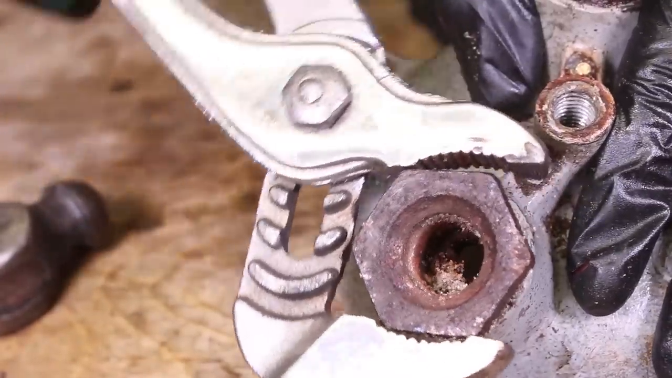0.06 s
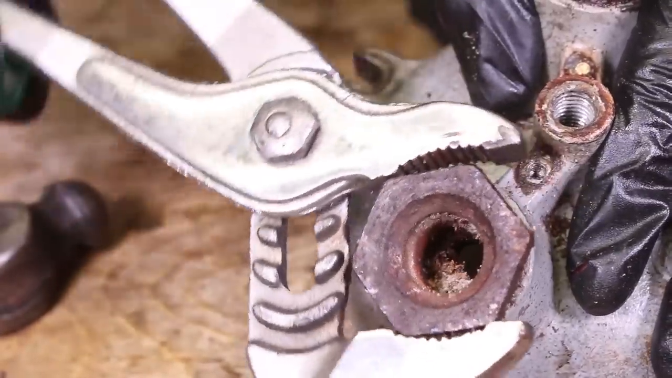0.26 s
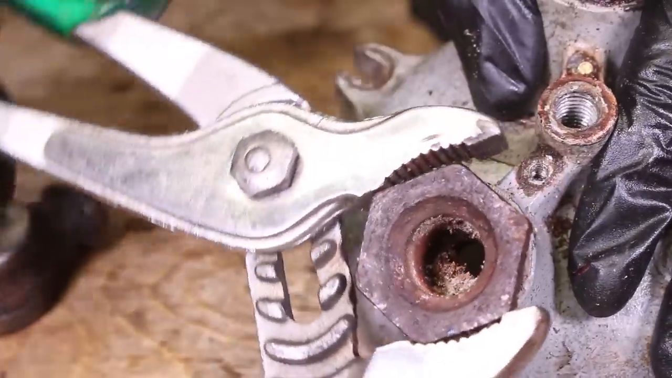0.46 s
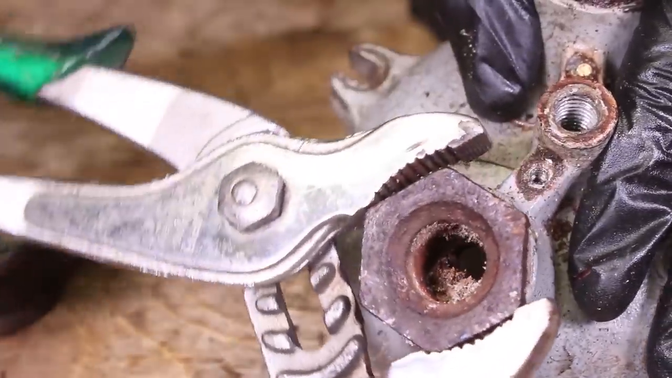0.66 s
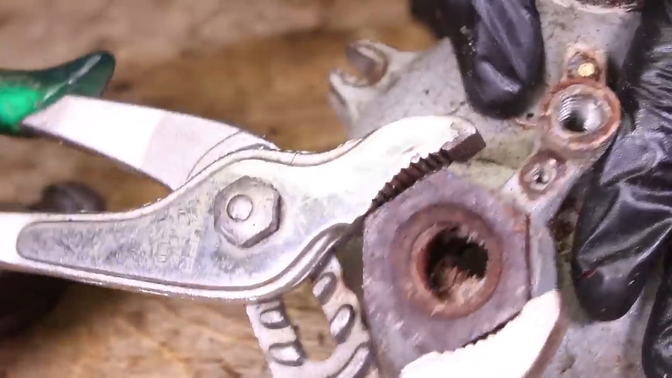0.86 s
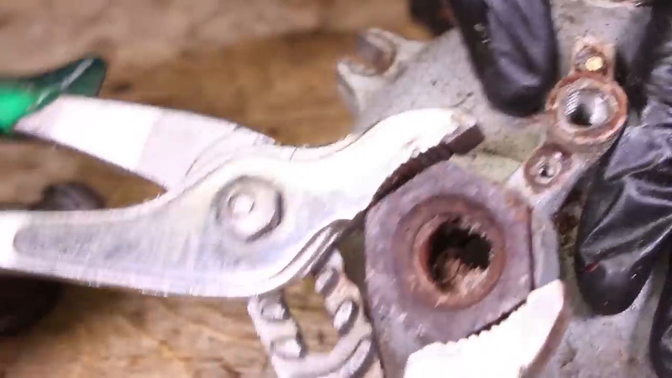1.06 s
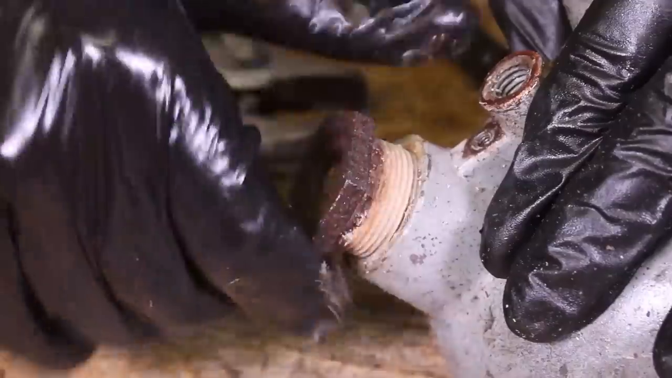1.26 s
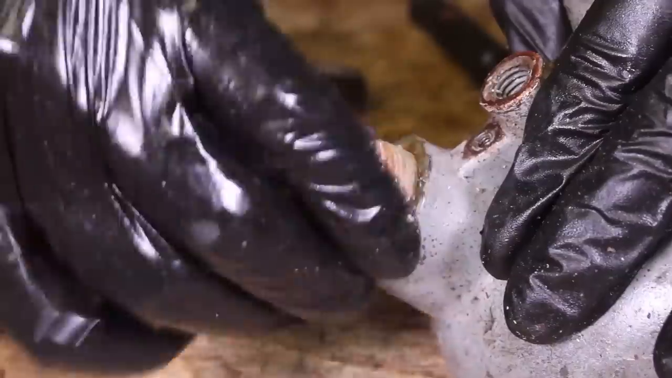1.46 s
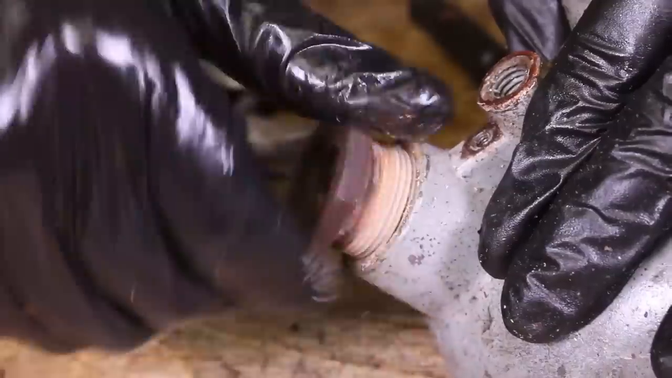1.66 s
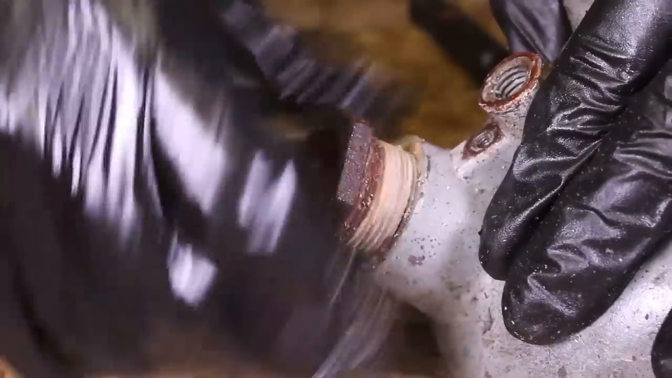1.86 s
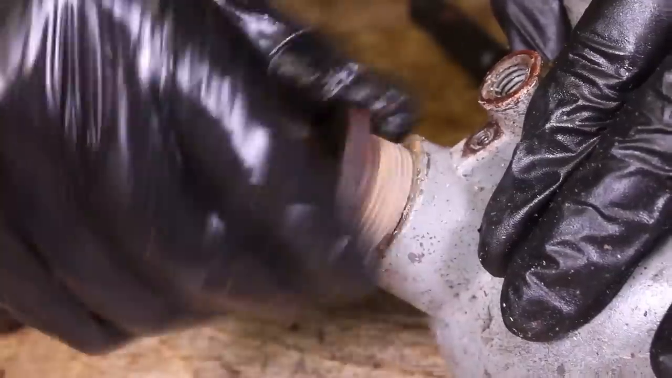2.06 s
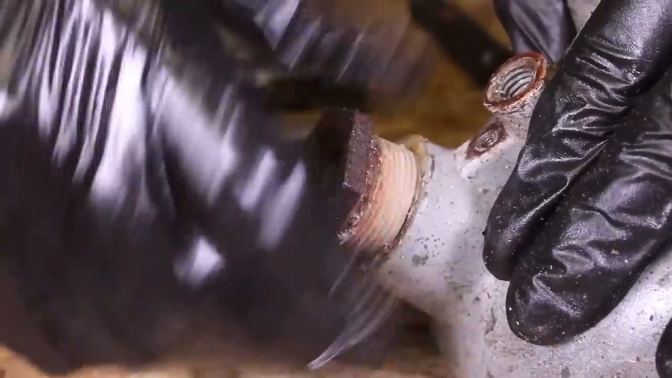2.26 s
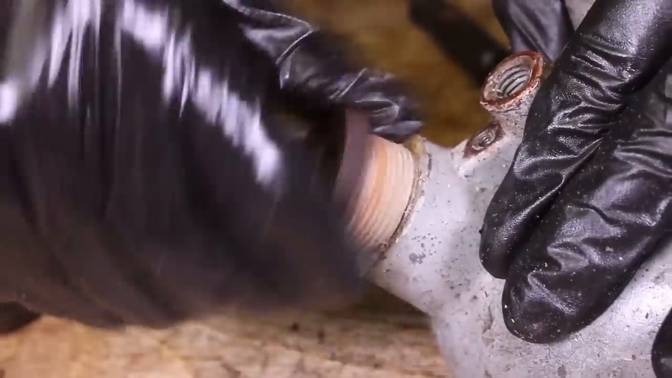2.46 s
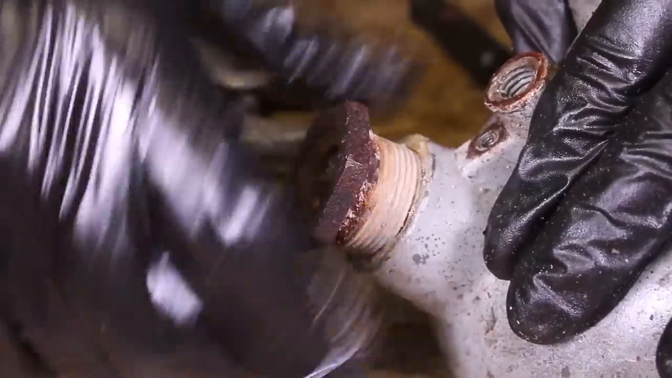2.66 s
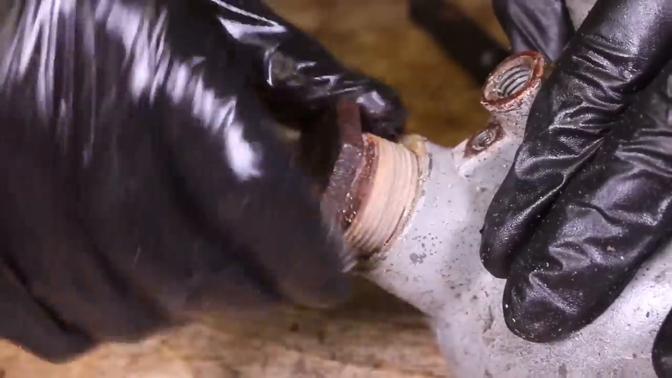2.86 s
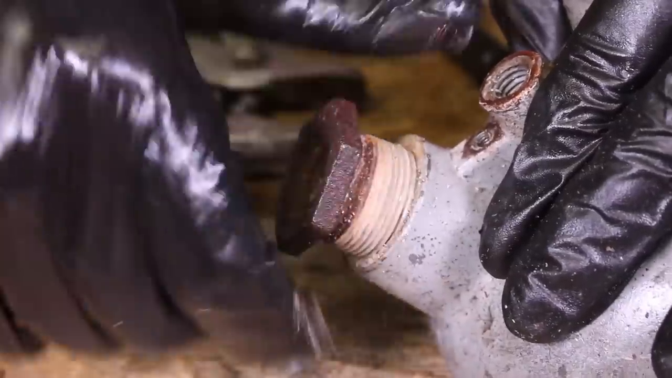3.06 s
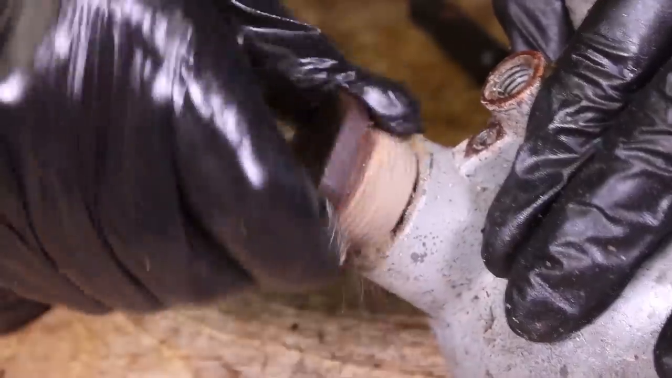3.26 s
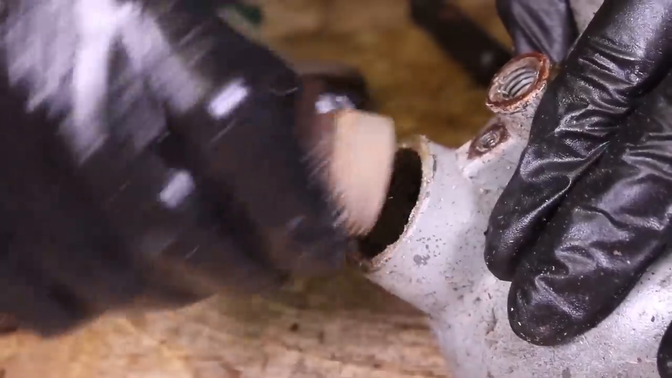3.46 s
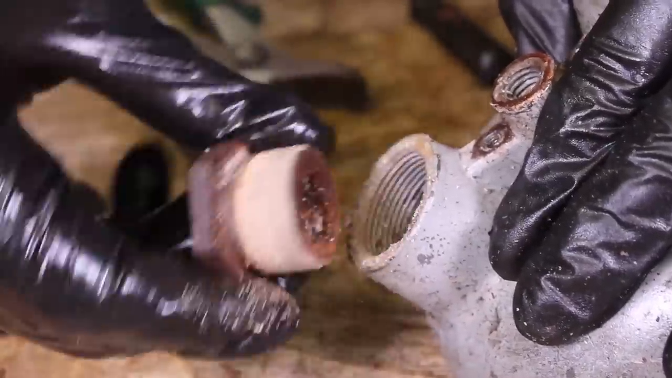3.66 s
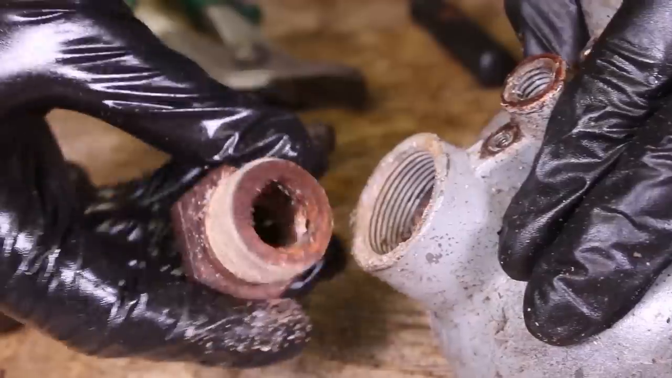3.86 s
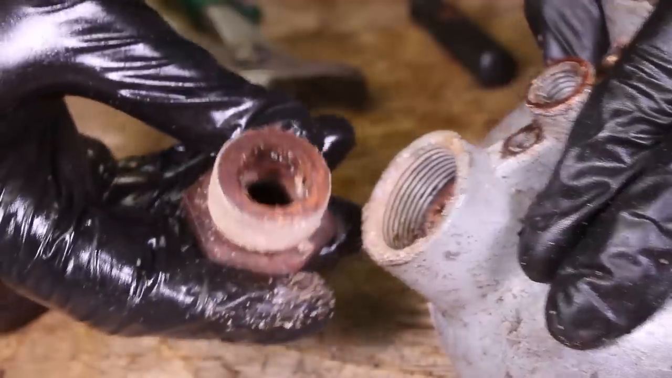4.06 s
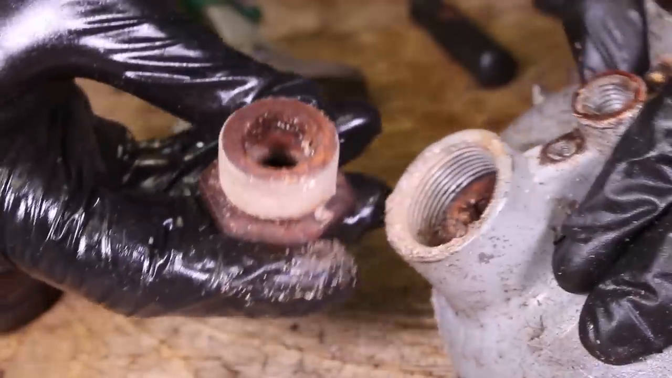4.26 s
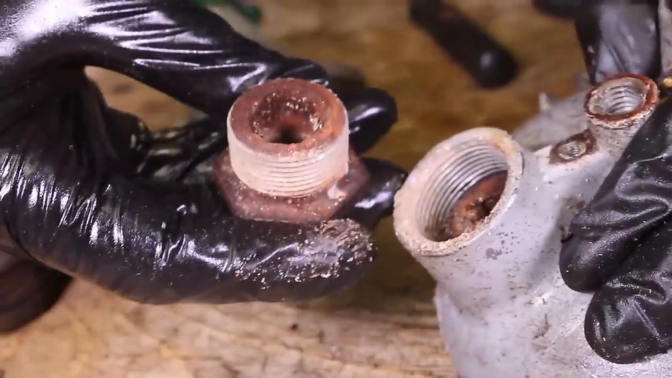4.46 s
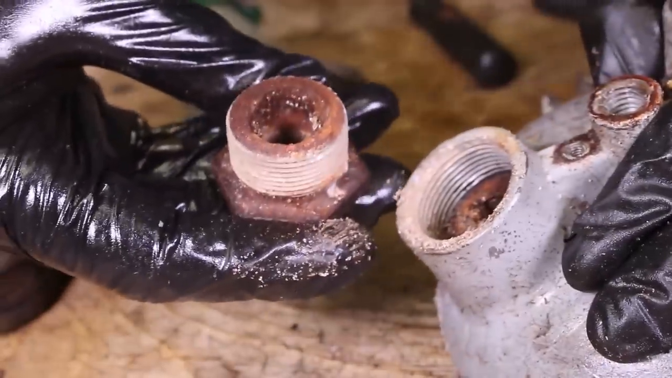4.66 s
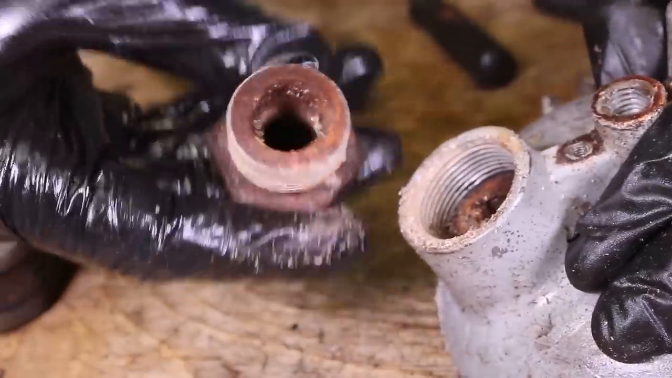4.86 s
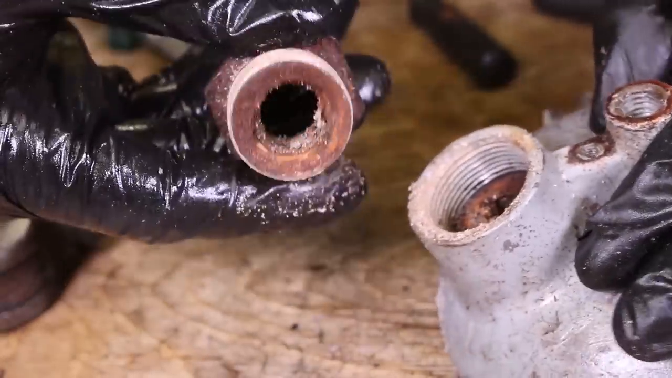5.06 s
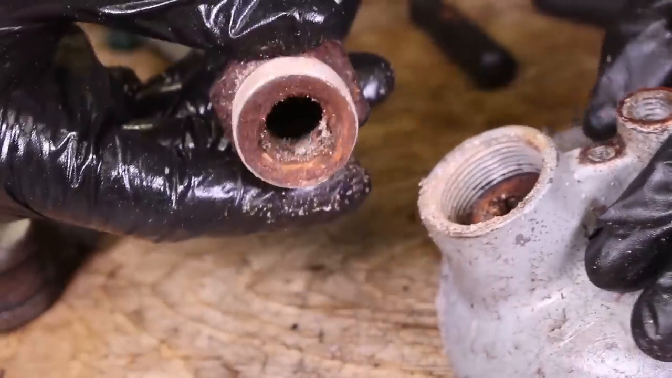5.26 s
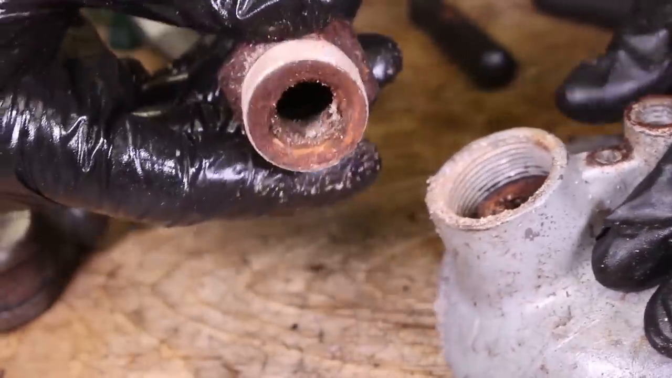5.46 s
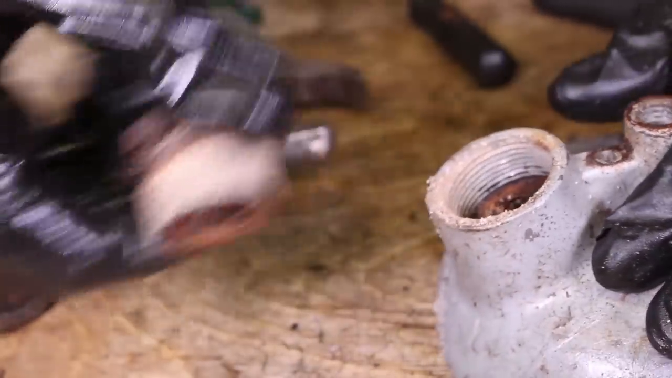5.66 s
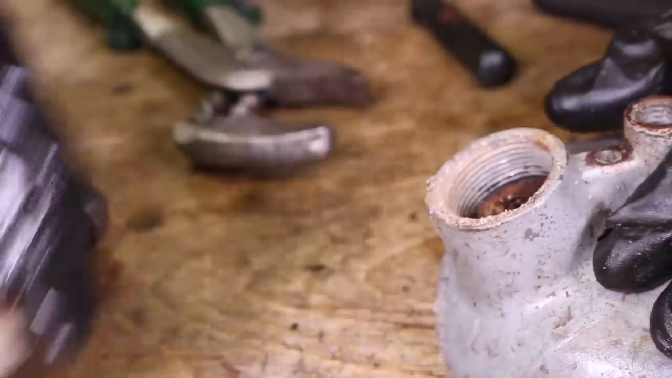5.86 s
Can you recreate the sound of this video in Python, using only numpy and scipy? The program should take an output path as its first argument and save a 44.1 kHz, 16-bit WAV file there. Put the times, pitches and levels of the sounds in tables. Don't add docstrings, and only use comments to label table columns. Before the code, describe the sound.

Close up in a small quiet workshop, plier jaws creak weakly on a seized nut for a second. It loosens with a soft bench thump, then gloved fingers twist it in separate gritty bursts, each rasping and knocking through the metal casting with low bench boom. A last hard clack frees it. Faint glove rustles and ticks follow, a light knock, quiet handling, and a final cluster of taps on wood.

```python
import sys
import numpy as np
from scipy import signal
from scipy.fft import rfft, irfft
from scipy.io import wavfile
from scipy.ndimage import uniform_filter1d

SR = 44100
rng = np.random.default_rng(int(sys.argv[2]) if len(sys.argv) > 2 else 0)


def how_loud(loudness_db):
    steps = np.asarray(loudness_db, float) / 20
    return 10 ** steps


def persist_wave(psi):
    counts = np.round(np.clip(psi, -1, 1) * 32767).astype(np.int16)
    wavfile.write(sys.argv[1], SR, np.atleast_2d(counts).T)


N = 261072

# pitch_hz, level_db (per Hz)
AIR_COLOUR = [(12, -34.5), (22, -5), (74, -24.5), (107, -14.5), (158, -30), (400, -25.5), (1510, -37.5),
              (15800, -43.5)]
# pitch_hz, level_db (rms)
MAINS_HUM = [(100.5, -88), (200, -80)]
# start_s, level_db, fade_s (per 20 dB)
CREAKS = [
    (.02, -71.5, 0.5),
    (.204, -64.5, 0.38),
    (.33, -64.5, 0),
    (.466, -69.5, 0.9),
    (.74, -60, 0.17),
    (.986, -57.5, 0.17),
    (1.041, -48.5, 0.16),
]
# time_s, ring_db
JAW_PRESSURE = [
    (0, -68),
    (.11, -74.5),
    (.25, -65),
    (.36, -76),
    (.6, -73),
    (.7, -90),
    (.94, -84),
    (1.0, -68),
    (1.06, -75),
]
# pitch_hz, level_db, t60_s
JAW_BODY = [(419.1, -2, 0.038), (698, -5.5, 0.036), (1082, -8.5, 0.036), (2251, 6.5, 0.0042)]
# pitch_hz, level_db, t60_s
JAW_RING = [(4250, 7, 0.011), (4670, -1, 0.019)]

# start_s, level_db, fade_s (per 20 dB)
JOLTS = [(.055, -42, 2.5), (.41, -39.5, 1), (.58, -46, -0.3), (0.713, -31.5, 0.35), (0.852, -24, 0),
         (1.075, -27.5, 0.24), (1.181, -34.5, 0.09), (1.444, -26, 0), (1.754, -27, 0), (2.108, -27, 0.01),
         (2.53, -36.5, 0.17), (2.93, -33.5, 0.18), (3.001, -32, 0.09), (3.065, -44, 0), (3.222, -41, 0.1),
         (3.351, -26, 0.15), (3.5, -48.5, 0.3), (5.1, -66, 1), (5.56, -25, 0.1), (5.68, -40, 0.17)]
# pitch_hz, level_db (per Hz)
SWAY_COLOUR = [(12, -19.5), (22, 4), (49, 0.5), (76, -20), (104, -29), (200, -47), (260, -70.5),
               (440, -120)]
# start_s, rustle_db, above_7khz_db, thin_top_db, fade_s (per 20 dB)
SLIDES = [(1.03, -58.5, -73, -73, 0), (1.18, -60.5, -63, -67, 1), (1.501, -41.5, -44.5, -48, 0.11),
          (1.604, -53.5, -51, -63, 0.07), (1.73, -64, -52, -59, .09), (1.828, -48, -50.5, -51, 0.09),
          (1.91, -63, -71, -69, 0.33), (2.075, -69, -66, -69, 0.4), (2.165, -60, -57, -54, 0.1),
          (2.203, -41, -57, -53, 0.03), (2.28, -57, -65, -64, 0.08), (2.315, -55.5, -58.5, -74, 0.04),
          (2.36, -67, -70, -73, 0.2), (2.575, -46.5, -50.5, -52, 0.09), (2.71, -62.5, -62.5, -69, 0.14),
          (2.925, -70, -58.5, -57, 0.14), (2.965, -66, -56, -54, -0.1), (3.02, -43, -39.5, -47, 0.0455),
          (3.15, -68.5, -71, -77, 0.2), (3.258, -71, -66, -60, 0.2), (3.32, -48, -46, -49, 0.03),
          (3.352, -41, -49.5, -48, -0.01), (3.45, -75, -75, -77, 0.36), (3.99, -72.5, -71.5, -78, 0.2),
          (4.04, -73.5, -73, -82, 0.14), (4.135, -69.5, -73, -78, .04), (4.35, -61.5, -75, -86, -1),
          (4.925, -48.5, -54.5, -62, 0.06), (5.0, -76, -61, -79, 2), (5.075, -67.5, -60.5, -79, 1.5),
          (5.13, -64, -61, -79, 5), (5.19, -69, -62, -80, 0.5), (5.291, -72, -68, -79, 1),
          (5.775, -80.5, -64, -78.5, 0.7)]
# start_s, rustle_db, above_7khz_db, thin_top_db, fade_s (per 20 dB)
GRABS = [(0.746, -63, -63.5, -76, 0.018), (0.87, -61.5, -64.5, -79, 0.15), (0.975, -65, -62, -75, 0.12),
         (1.196, -44.5, -52.5, -58, 0.1), (1.362, -62, -57, -63, 0.21), (1.684, -59, -54, -60, 0.097),
         (1.797, -64, -51, -57, .06), (2.038, -64, -60, -66, 0.066), (2.134, -64, -62, -58, .08),
         (2.422, -66, -61, -65.5, 0.11), (2.54, -51, -46.5, -54, .1), (2.832, -67, -52.5, -70, 0.043),
         (2.9, -70, -65, -61.5, .06), (3.22, -69.5, -60, -58.5, 0.051), (4.865, -64.5, -72, -74, 0.2),
         (4.158, -45, -49.5, -57, 0.09), (5.505, -45, -41.5, -51.5, 0.053), (5.538, -42.5, -63, -57, 0.074)]
# pitch_hz, level_db (per Hz)
GLOVE_COLOUR = [(880, -36.5), (1500, -16), (2290, -12), (4080, -3.5), (7500, 0), (9300, 0.5),
                (11000, -16.5), (16000, -55)]
# pitch_hz, level_db (per Hz)
GLOVE_TOP = [(6470, -33), (11000, -7), (13100, 5), (15100, -5.5), (15800, -10.5)]
# start_s, peak_db, pitch_hz
TICKS = [(0.2877, -54, 4500), (0.8659, -42, 6100), (0.9747, -41.5, 6700), (1.1308, -48, 5200),
         (1.1917, -39, 5700), (1.343, -44, 2510), (1.6845, -47, 9300), (1.761, -47, 8000),
         (1.901, -59, 11000), (1.9291, -41.5, 4440), (1.951, -49, 7000), (2.04, -53, 8500),
         (2.308, -40, 5300), (2.344, -45, 4100), (2.4268, -46.5, 8100), (2.833, -43.5, 8100),
         (3.2197, -46.5, 9500), (3.226, -43.5, 9500), (3.239, -53.5, 5190), (3.247, -55, 4770),
         (3.6696, -54.5, 4970), (3.927, -55, 5010), (4.001, -56.5, 5500), (4.027, -53.5, 3500),
         (4.036, -56, 8200), (4.134, -52.5, 5600), (4.3308, -51, 5240), (4.382, -54, 5010),
         (4.4308, -56.5, 5530), (4.6195, -57, 6200), (4.873, -51.5, 5900), (5.025, -46, 8080),
         (5.0832, -43.5, 4940), (5.1558, -46.5, 5870), (5.239, -46.5, 4220), (5.207, -49, 4810),
         (5.29, -51.5, 5800), (5.378, -53.5, 6200)]

# bite_s, fastest_s, bite_db, fastest_db, fade_s (per 20 dB)
TURNS = [(0.971, 1.04, -54.5, -62, -0.8), (1.259, 1.287, -60.5, -65.5, 0.5),
         (1.347, 1.382, -59.5, -73, 0.2), (1.388, 1.396, -47, -50.5, 0.07),
         (1.419, 1.503, -31.5, -26.5, 0.01), (1.506, 1.554, -27.5, -31, -0.0258),
         (1.592, 1.61, -40.5, -52, 0.07), (1.715, 1.73, -59, -50, 0.05), (1.737, 1.794, -28, -28, -0.3),
         (1.811, 1.84, -20.5, -21.5, 0), (2.04, 2.068, -58, -55, 1), (2.078, 2.136, -34, -30.5, 0.0647),
         (2.142, 2.215, -19, -27.5, -0.05), (2.428, 2.465, -56.5, -54, 0.22),
         (2.472, 2.551, -33.5, -22, .02), (2.559, 2.608, -19, -32, .06), (2.66, 2.721, -44.5, -48.5, 0.02),
         (2.842, 2.851, -55, -43.5, .02), (2.863, 2.886, -36, -32.5, -0.5),
         (2.904, 2.937, -14.5, -24, 0.0051), (2.992, 3.007, -38, -45, 0.0868),
         (3.296, 3.308, -28.5, -12.5, 0.0038), (3.324, 3.364, -22, -31.5, -0.02)]
# start_s, boom_db, rasp_db, nut_lower_db, nut_upper_db
GRIPS = [(0, 0.1, -1, -0.2, 1), (1.37, 3.5, 4.5, -2, -2), (1.46, 1.6, 4.5, -0.5, -1.5),
         (1.7, 1.5, 0.5, -6, -5.5), (1.8, 0.5, -1, -1.5, -2.5), (2.03, 0.5, -5.5, -0.5, -4.1),
         (2.125, -3, 1, -4.5, 2.5), (2.18, 0, -0.8, -1, -1.5), (2.41, 4.2, 1, 1, 3),
         (2.54, 0, -0.5, -1.1, 4.7), (2.83, 3.2, -9, -10, -12), (2.89, 0.5, -1.8, 2, -4),
         (3.25, 1.3, 1.5, -2, 2.5), (3.315, 1.1, -2, -5.5, 5)]
# start_s, edge_db, housing_db, nut_db, thud_db
CATCHES = [(1.3921, -55, -42, -67, -40), (1.4218, -21.5, -32, -52, -35), (1.7344, -15.5, -21, -57.5, -26.5),
           (1.7587, -37, -27.5, -54.5, -44), (1.8068, -25, -17.5, -41, -31), (1.8258, -40, -19.5, -30, -44),
           (2.0687, -48, -31.5, -71, -35), (2.084, -44, -29, -58, -44.5), (2.1345, -24, -27.5, -38, -44),
           (2.175, -31, -23, -52, -44), (2.4736, -6, -26, -26, -35.5), (2.5565, -23.5, -16, -31, -32.5),
           (2.8655, -60, -37.5, -70, -42), (2.898, -30, -21, -51, -39), (2.9082, -31.5, -16.5, -23, -38.5),
           (2.9276, -15, -19, -38, -38), (2.94, -25, -23.5, -41.5, -45), (3.3056, 2.5, -13, -25.5, -24),
           (3.3083, -8, -21, -35, -40), (3.322, -30, -22, -30, -40)]
# pitch_hz, level_db, t60_s
HOUSING = [(235, -18, 0.014), (297.2, -1.5, .09), (342.2, -6, 0.053), (411, -4.5, 0.046),
           (471.5, -3.5, .055), (550, -10, 0.016), (651, -0.5, 0.045), (679.3, -1.5, 0.05),
           (729.3, -2, 0.049), (838.7, -7.5, 0.0065), (1073, -1.5, 0.029), (917, -8.5, 0.02),
           (570.2, 5, 0.0031), (941.6, 5, 0.0045)]
# pitch_hz, level_db, t60_s
RASP = [(1334, 1, 0.016), (1488, 1, 0.022), (1656, 5, 0.018), (2130, -3.5, 0.012), (2479, -7.5, 0.0076),
        (2860, -3, 0.017), (3450, -2, 0.0034), (1860, 5, 0.0026), (2520, 3.5, .003), (3150, 2, 0.0021)]
# pitch_hz, level_db, t60_s
NUT = [(3888, 0, .045), (4185, -1, .05), (4480, -13, .015), (4790, -17, .02), (5400, -22, .015)]
# pitch_hz, level_db, t60_s
BENCH = [(40, -7, 0.075), (64, 1, 0.2), (106, 4, 0.14), (140, 2.5, 0.18), (170, -6, 0.12)]

# start_s, level_db, thud_db
SET_DOWN = [
    (1.057, -12, -32),
]
# pitch_hz, level_db, t60_s
WOOD = [(298, -2.5, 0.079), (371, 2, 0.027), (578, -8.5, 0.0264), (754, -11, 0.029), (1005, -4.5, 0.015),
        (1630, -12.5, 0.0067), (2066, -8, 0.0094), (3040, -10.5, .02)]
# start_s, mid_crack_db, dull_db, high_crack_db, thud_db
KNOCKS = [
    (4.1564, -22, -19.5, -40, -66),
    (4.1666, -26.5, -16.5, -39, -72),
    (4.1756, -22, -17, -37, -92.5),
    (5.414, -38, -28.5, -67, -75),
    (5.4285, -34, -18.5, -66, -65.5),
    (5.457, -39, -24, -55, -61),
    (5.5048, -23.5, -16, -28, -63),
    (5.5333, -23, -16, -34, -49),
    (5.5431, -23.5, -15.5, -41, -31),
    (5.5732, -18.5, -25, -62, -36.5),
]
# pitch_hz, level_db, t60_s
PART = [(326, -3, 0.049), (466, 0.5, 0.036), (690, 4.5, 0.018), (1008, 2.5, 0.014), (1510, -4, 0.013)]
# pitch_hz, level_db, t60_s
PART_SURFACE = [(1794, 2.5, 0.0036), (2662, 0, .005), (3120, 3, 0.0019), (4187, 0.5, 0.0028),
                (5320, -1.5, 0.0025)]
# start_s, dull_db, bright_db, rise_s, fade_s (per 20 dB)
SCUFFS = [(4.168, -25.5, -29.5, 0.01, 0.015), (4.2, -36, -41, 0.0343, 0.0474),
          (4.47, -68, -89.5, 0.16, 0.06), (4.93, -65, -64.5, -0.3, -0.1), (5.075, -62, -79, 0.15, 0.05),
          (5.112, -62, -70, -0.1, -0.04), (5.156, -52, -60, -0.01, 0.05), (5.242, -66, -68, -0.1, 0.14),
          (5.36, -65.5, -83, 0, 0.14), (5.417, -34, -48, -0.0047, 0), (5.432, -36.5, -43.5, 0.01, 0.0459),
          (5.458, -38.5, -46.5, 0.01, 0.06), (5.507, -28, -29.5, -0.0019, 0.0234),
          (5.575, -40.5, -37, -0.01, 0.05), (5.82, -81, -69.5, 0.24, -0.2)]
# start_s, level_db, rise_s, fade_s (per 20 dB)
BRUSHES = [(4.028, -61, 1, 0.07), (4.88, -68, .02, .06), (4.935, -58.5, 0.04, 0.05), (4.99, -67, 0.3, -0.1),
           (5.073, -63, .015, -0.2), (5.11, -65, .015, -0.2), (5.157, -61, -0.1, 0.04),
           (5.24, -56, 0.006, -0.2)]
# pitch_hz, level_db, t60_s
NUT_MOUTH = [(1050, -0.5, 0.034), (1752, -8, 0.023)]
# pitch_hz, t60_s
ROOM_DECAY = [(200, 0.2), (500, 0.21), (1500, 0.17), (4000, 0.14), (10000, 0.073)]


def rms_one(x):
    return x / np.sqrt(np.mean(x ** 2) + 1e-20)


def shaped(x, spectrum):
    hz, level_db = np.transpose(spectrum)
    log_hz = np.log(np.arange(N // 2 + 1) * SR / N + 1)
    gain = how_loud(np.interp(log_hz, np.log(hz), level_db))
    return rms_one(irfft(rfft(x) * gain, N))


def drift(rate_hz):
    lowpass = signal.butter(2, rate_hz * 100, fs=SR)
    slow = signal.lfilter(*lowpass, rng.standard_normal(N // 100 + 202))[200:]
    return np.interp(np.arange(N) / 100, np.arange(len(slow)), rms_one(slow))


def swells(start_s, level_db, rise_s, fall_s, until_s=None, end_db=None):
    time, out = np.arange(N) / SR, np.full(N, -120.)
    until_s = start_s if until_s is None else until_s
    end_db = level_db if end_db is None else end_db
    for a, a_db, rise, fall, b, b_db in np.broadcast(start_s, level_db, rise_s, fall_s, until_s, end_db):
        end = max(a, b)
        points = [a - 5 * abs(rise), a, end + 1e-4, end + 5 * abs(fall)]
        out = np.maximum(out, np.interp(time, points, [a_db - 100, a_db, b_db, b_db - 100]))
    return out


def ring(force, hz, t60):
    radius, turn = how_loud(-60 / (t60 * SR)), 2 * np.pi * hz / SR
    return signal.lfilter([0, np.sin(turn)], [1, -2 * radius * np.cos(turn), radius ** 2], force + 1e-18)


def body(force, modes):
    return sum((-1) ** k * how_loud(level_db) * ring(force, hz, t60) for k, (hz, level_db, t60) in enumerate(modes))


def grains(per_s, spread_db):
    sizes = how_loud(spread_db * np.minimum(rng.exponential(1, N), 4)) * rng.choice([-1, 1], N)
    return rms_one(sizes * (rng.random(N) < per_s / SR))


def rubbed(level_db, modes, per_s, spread_db, soft_hz, wander_db):
    force = signal.lfilter(*signal.butter(2, soft_hz, fs=SR), grains(per_s, spread_db))
    scale = how_loud(level_db - 3.0) / body(force, modes).std()
    return sum((-1) ** k * ring(force * scale * how_loud(db + wander_db * drift(18)), hz, t60)
               for k, (hz, db, t60) in enumerate(modes))


def pushes(times, level_db, contact_ms=0):
    out = np.zeros(N)
    for s, db in np.broadcast(times, level_db):
        push = np.hanning(int(contact_ms * SR / 1000) + 3)
        start = int(s * SR)
        out[start:start + len(push)] += how_loud(db) * push / push.sum()
    return out


def strike(times, level_db, modes, scatter_db, contact_ms):
    luck = scatter_db * rng.standard_normal((len(times), len(modes)))
    return sum(ring(pushes(times, level_db + mode_db + luck[:, k], contact_ms), hz, t60)
               for k, (hz, mode_db, t60) in enumerate(modes))


def crack(times, level_db, low_hz, high_hz, t60):
    fade = signal.lfilter([1], [1, -how_loud(-60 / (t60 * SR))], pushes(times, level_db))
    band = signal.butter(2, [low_hz, high_hz], "band", fs=SR, output="sos")
    white = rng.standard_normal(N)
    return signal.sosfilt(band, fade * white) / signal.sosfilt(band, white).std()


def air():
    time = np.arange(N) / SR
    hum = sum(np.sqrt(2) * how_loud(level_db) * np.sin(2 * np.pi * hz * time) for hz, level_db in MAINS_HUM)
    return how_loud(-67.5) * shaped(rng.standard_normal(N), AIR_COLOUR) + hum


def pliers():
    start_s, level_db, fade_s = np.transpose(CREAKS)
    creak_db = swells(start_s, level_db, 0.23 * fade_s, fade_s)
    ring_db = np.interp(np.arange(N) / SR, *np.transpose(JAW_PRESSURE), right=-120)
    creak = rubbed(creak_db, JAW_BODY, per_s=500, spread_db=1.5, soft_hz=1507, wander_db=4)
    return creak + rubbed(ring_db, JAW_RING, per_s=1500, spread_db=-4.5, soft_hz=6040, wander_db=1.5)


def gestures():
    start_s, *levels_db, fade_s = np.transpose(SLIDES + GRABS)
    fade_s = np.clip(fade_s, .015, .2)
    slide_rise_s = 0.6 * fade_s[:len(SLIDES)]
    rise_s = np.r_[slide_rise_s, np.full(len(GRABS), .008)]
    moves = [swells(start_s, db, rise_s, fade_s) for db in levels_db]
    jolt_s, jolt_db, jolt_fade_s = np.transpose(JOLTS)
    moves.append(swells(jolt_s, jolt_db, 0.043 * jolt_fade_s, jolt_fade_s))
    hold = swells(0, 0, 1, 1.0, until_s=3.33, end_db=0)
    return [np.maximum(move, hold + db) for move, db in zip(moves, (-77, -77, -80, -61.5))]


def hands():
    low_db, high_db, top_db, sway_db = gestures()
    crackle = rng.standard_normal(N) + 0.8 * grains(per_s=4500, spread_db=6.0)
    rubber = shaped(crackle, GLOVE_COLOUR)
    low = signal.filtfilt(*signal.butter(3, 6800, fs=SR), rubber)
    rustle = low * how_loud(low_db + 1.2 * drift(14))
    rustle = rustle + (rubber - low) * how_loud(high_db + 1.2 * drift(14))
    rustle = rustle + how_loud(top_db) * shaped(crackle, GLOVE_TOP)
    sway = how_loud(sway_db) * shaped(rng.standard_normal(N), SWAY_COLOUR)
    return rustle * how_loud(1.2 * drift(60)), sway


def ticks():
    out, time = np.zeros(N), np.arange(600) / SR
    for s, peak_db, hz in TICKS:
        snap = rng.standard_normal(600) * how_loud(peak_db - 60 * time / 0.018)
        narrow = signal.lfilter(*signal.butter(1, [hz * 0.95, hz * 1.07], "band", fs=SR), snap)
        broad = signal.lfilter(*signal.butter(1, [hz * 1.2, min(hz * 1.5, 16000)], "band", fs=SR), snap)
        start = int(s * SR)
        out[start:start + 600] += 2.3 * narrow + 0.594 * broad
    return out


def grips():
    grip_s, *gains_db = np.transpose(GRIPS)
    grip = np.searchsorted(grip_s[1:], np.arange(N) / SR)
    return [uniform_filter1d(db[grip], size=400) for db in gains_db]


def held(nut):
    _, _, lower_db, upper_db = grips()
    lower = signal.sosfiltfilt(signal.butter(10, 4035, fs=SR, output="sos"), nut)
    return how_loud(lower_db) * lower + how_loud(upper_db) * (nut - lower)


def thread():
    bite_s, fast_s, bite_db, fast_db, fade_s = np.transpose(TURNS)
    fade_s = np.clip(fade_s, .006, .065)
    grind_db = swells(bite_s, bite_db, 0.014, fade_s, fast_s, fast_db)
    boom_db, rasp_gain_db = grips()[:2]
    housing = rubbed(grind_db, HOUSING, per_s=1100, spread_db=2.5, soft_hz=1700, wander_db=2.2)
    boom = signal.filtfilt(*signal.butter(2, 420, fs=SR), housing)
    housing = housing + (how_loud(boom_db) - 1) * boom
    rasp_db = rasp_gain_db - 33.5 + 1.22 * (grind_db + 20.0)
    rasp = rubbed(rasp_db, RASP, per_s=1800, spread_db=2.5, soft_hz=3530, wander_db=2.5)
    nut_db = -36.5 + 1.27 * (grind_db + 20.5)
    nut = held(rubbed(nut_db, NUT, per_s=2400, spread_db=0.5, soft_hz=5144, wander_db=2.5))
    turning = np.arange(N) > 1.37 * SR
    shake = rubbed(grind_db - 15.5, BENCH, per_s=79, spread_db=3, soft_hz=300, wander_db=2.0)
    return housing + (rasp + nut) * turning, shake


def knocks():
    start_s, mid_db, dull_db, high_db, thud_db = np.transpose(KNOCKS)
    dull = strike(start_s, dull_db - 10.0, PART, scatter_db=2.5, contact_ms=0.82)
    mid = crack(start_s, mid_db - 5.0, low_hz=1400, high_hz=4970, t60=0.018)
    high = crack(start_s, high_db, low_hz=5022, high_hz=12300, t60=0.0075)
    land_s, land_db, land_thud_db = np.transpose(SET_DOWN)
    landing = strike(land_s, land_db, WOOD, scatter_db=0, contact_ms=0.56)
    all_s, all_thud_db = np.r_[start_s, land_s], np.r_[thud_db - 3, land_thud_db]
    thud = strike(all_s, all_thud_db, BENCH, scatter_db=4, contact_ms=4)
    return dull + mid + high + landing, thud


def catches():
    start_s, edge_db, housing_db, nut_db, thud_db = np.transpose(CATCHES)
    housing = strike(start_s, housing_db - 6.0, HOUSING, scatter_db=4, contact_ms=0.64)
    edge = ring(pushes(start_s, edge_db + 4.5, contact_ms=0.73), hz=1240, t60=0.0028)
    rasp = strike(start_s, edge_db - 17.5, RASP, scatter_db=0, contact_ms=0.39)
    nut = held(strike(start_s, nut_db + 4.5, NUT, scatter_db=1.5, contact_ms=0.25))
    thud = strike(start_s, thud_db - 8, BENCH, scatter_db=2.0, contact_ms=2.7)
    return housing + edge + rasp + nut, thud


def brushing():
    start_s, level_db, rise_s, fade_s = np.transpose(BRUSHES)
    touch_db = swells(start_s, level_db, np.clip(rise_s, .004, .04), np.clip(fade_s, .02, .07))
    return rubbed(touch_db, NUT_MOUTH, per_s=1300, spread_db=3, soft_hz=2492, wander_db=3.0)


def shifting():
    start_s, dull_db, bright_db, rise_s, fade_s = np.transpose(SCUFFS)
    dull_db = swells(start_s, dull_db, rise_s, fade_s)
    bright_db = swells(start_s, bright_db, rise_s, 1.35 * fade_s)
    dull = rubbed(dull_db, PART, per_s=900, spread_db=2.5, soft_hz=1821, wander_db=2.5)
    return dull + rubbed(bright_db, PART_SURFACE, per_s=2500, spread_db=4.5, soft_hz=5600, wander_db=1.2)


def workshop(x):
    time, tail = np.arange(SR // 2) / SR, 0
    for hz, t60 in ROOM_DECAY:
        band = signal.butter(1, [hz * 0.55, hz * 2.1], "band", fs=SR)
        tail = tail + signal.lfilter(*band, rng.standard_normal(len(time))) * how_loud(-60 * time / t60)
    tail = tail * np.clip(time / 0.0041, 0, 1)
    return signal.fftconvolve(x, tail / np.sqrt(np.sum(tail ** 2)))[:N]


def scene():
    rustle, sway = hands()
    grind, shake = thread()
    tap, tap_thud = knocks()
    jam, jam_thud = catches()
    parts = pliers() + grind + tap + jam + brushing() + shifting()
    small = signal.sosfilt(signal.butter(4, 190, "high", fs=SR, output="sos"), parts)
    near = small + ticks() + rustle
    bench = shake + jam_thud + tap_thud + sway
    return (near + how_loud(-11) * workshop(near) + bench + air())[None]


def roll_off(x):
    return signal.sosfilt(signal.butter(12, 16460, fs=SR, output="sos"), x)


def record(dry):
    mix = signal.sosfilt(signal.butter(3, 30, "high", fs=SR, output="sos"), dry)
    mix = np.clip(mix, -.98, .98)
    mix = signal.sosfiltfilt(signal.cheby2(12, 50, 16350, fs=SR, output="sos"), mix)
    return roll_off(mix)


dry = scene()
out = record(dry)
persist_wave(out)
```